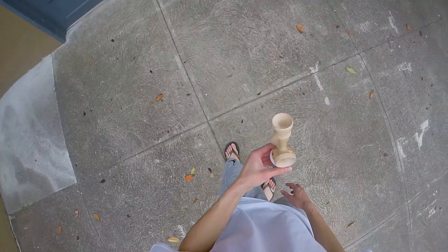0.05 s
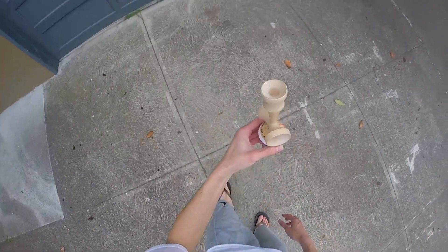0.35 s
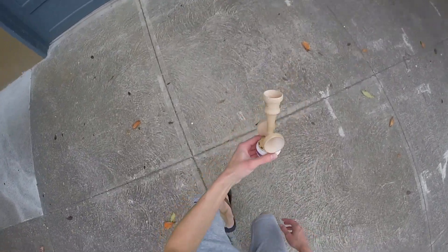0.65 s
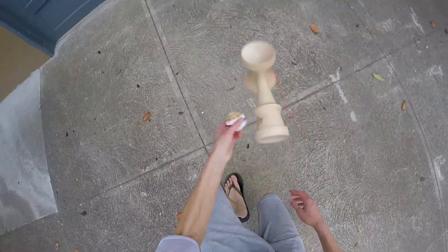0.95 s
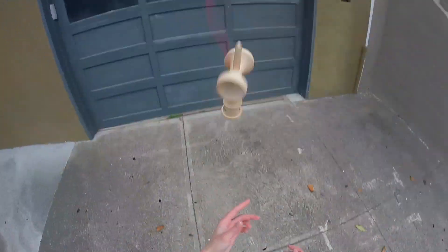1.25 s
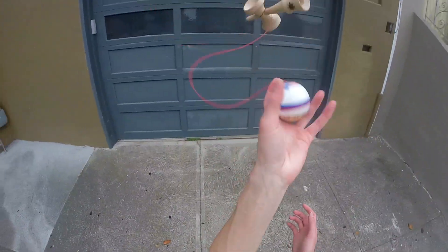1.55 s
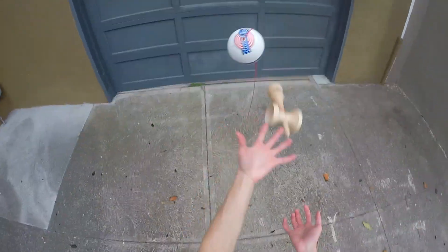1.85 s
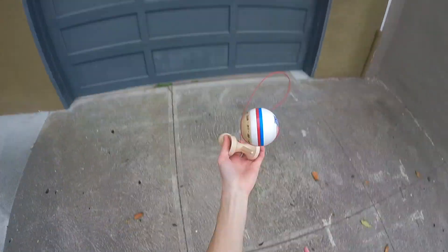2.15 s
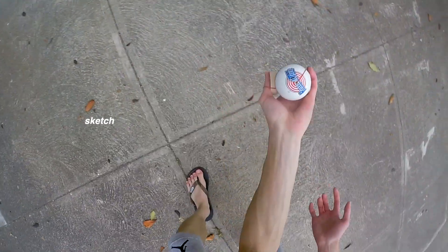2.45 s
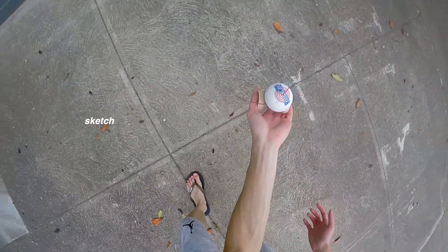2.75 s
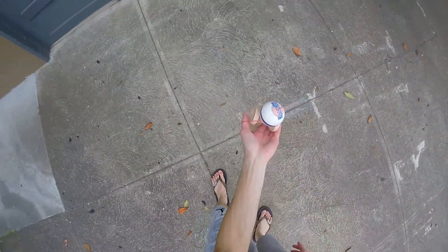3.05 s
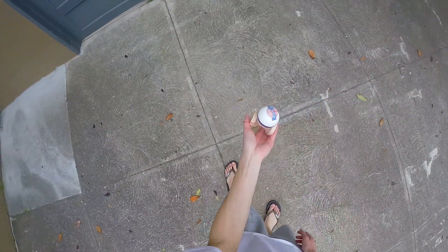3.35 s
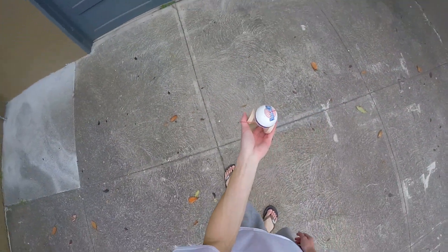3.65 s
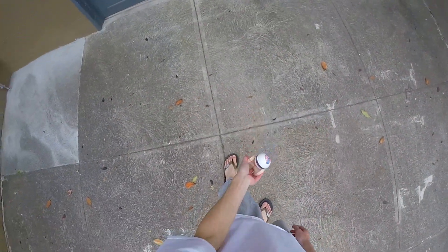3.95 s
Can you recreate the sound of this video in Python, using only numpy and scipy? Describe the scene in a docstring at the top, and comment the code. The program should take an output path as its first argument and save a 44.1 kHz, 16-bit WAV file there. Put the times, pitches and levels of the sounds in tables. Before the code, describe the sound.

Sharp wooden kendama clacks and palm catches outdoors, over faint distant traffic and wind.

```python
"""Sharp wooden clacks: a kendama ball knocks off its spike and meets the handle. The pieces are tossed,
tick in the air as the string flicks the handle, and slap into the palm; at last the ball drops onto
the spike and rattles once. Each clack is a dry crack plus a short ring of wooden modes.
Clothes and sandals scuff; the concrete driveway and a garage door return a short tail.
Behind the play, far traffic rumbles, wind thumps softly and a hiss slowly swells."""
import sys
import numpy as np
from scipy import signal
from scipy.fft import rfft, irfft
from scipy.io import wavfile

SR = 44100
rng = np.random.default_rng(int(sys.argv[2]) if len(sys.argv) > 2 else 0)


def materialize(psi):
    """Save the field psi as 16-bit PCM at rate SR to the path in sys.argv[1].

    A 1-D psi becomes a single channel; in a 2-D psi each row is a channel.
    """
    bounded = np.clip(np.atleast_2d(psi).T, -1, 1)
    quanta = np.round(bounded * 32767).astype(np.int16)
    wavfile.write(sys.argv[1], SR, quanta)


N = 176400
TIME_S = np.arange(N) / SR
BINS_HZ = np.fft.rfftfreq(N, 1 / SR)


def from_db(db):
    """Decibels to gain."""
    return 10 ** (np.asarray(db) / 20)


def unit_rms(x):
    """Scale to unit power."""
    return x / np.sqrt(np.mean(x ** 2) + 1e-20)


def db_at(spectrum, hz):
    """Interpolate (Hz, dB) points on a log-frequency axis."""
    points_hz, db = np.transpose(spectrum)
    return np.interp(np.log(np.maximum(hz, 1)), np.log(points_hz), db)


def add(out, start_s, x):
    """Mix x into out at start_s."""
    i = int(start_s * SR)
    out[i:i + len(x)] += x[:N - i]


def butter(x, order, cut_hz, kind="low"):
    """Causal Butterworth filter."""
    return signal.sosfilt(signal.butter(order, cut_hz, kind, fs=SR, output="sos"), x)


def noise(spectrum, tilt_db_per_oct=0):
    """Unit-RMS noise with a given spectral shape and tilt."""
    hz = np.maximum(BINS_HZ, 1)
    gain = from_db(db_at(spectrum, hz) + tilt_db_per_oct * np.log2(hz))
    return unit_rms(irfft(rfft(rng.standard_normal(N)) * gain, N))


def drift(rate_hz):
    """Smooth random wander, unit RMS."""
    return unit_rms(irfft(rfft(rng.standard_normal(N)) / (1 + (BINS_HZ / rate_hz) ** 2), N))


def bump(centre_s, sigma_s):
    """Gaussian envelope, peak 1."""
    return np.exp(-.5 * ((TIME_S - centre_s) / sigma_s) ** 2)


def decay(t, t60_s):
    """Exponential fall of 60 dB in t60_s."""
    return np.exp(-np.log(1000) * t / t60_s)


def minimum_phase(x, gain_db):
    """Filter by a gain per bin so that nothing sounds early."""
    cepstrum = irfft(np.log(from_db(gain_db)))
    cepstrum[1:len(x) // 2] *= 2
    cepstrum[len(x) // 2 + 1:] = 0
    return irfft(rfft(x) * np.exp(rfft(cepstrum)))


# Far traffic and air; low drone and swell. Each row: frequency in Hz, relative density in dB.
TRAFFIC_SPECTRUM = [(12, 1.5), (20, -6), (105, -5), (183, -11), (445, -17.5), (800, -19), (1050, -26.5),
                    (2220, -36.5), (6010, -52), (15000, -57)]
LOW_SPECTRUM = [(40, -16), (100, -3.5), (170, -3), (300, -11.5), (500, -19.5), (2000, -66)]


def street():
    """Far traffic with wavering bass, a low drone, and one low swell around the first clacks."""
    air = from_db(-46) * noise(TRAFFIC_SPECTRUM)
    bass = signal.sosfiltfilt(signal.butter(2, 200, fs=SR, output="sos"), air)
    rumble = air + bass * (from_db(3.5 * drift(rate_hz=0.71)) - 1)
    drone_hz, width_hz = 104, 39
    resonance = signal.iirpeak(drone_hz, drone_hz / width_hz, fs=SR)
    drone = from_db(-53) * unit_rms(signal.lfilter(*resonance, noise(LOW_SPECTRUM)))
    swell = from_db(-44.5) * bump(centre_s=0.095, sigma_s=0.43) * noise(LOW_SPECTRUM)
    return rumble + drone + swell


# Hiss envelope. Each row: time in seconds, level in dB.
HISS_LEVELS = [(.7, -59), (3.0, -56.5), (3.3, -54), (3.7, -51), (4, -52.5)]
# Each row: frequency in Hz, relative density in dB.
HISS_SPECTRUM = [(100, 9.5), (300, 8), (750, 6.5), (1300, -9.5), (2700, -2), (4000, -7), (6000, -8.5),
                 (11000, -25.5), (15000, -48.5)]


def hiss():
    """A distant hiss grows, peaking near the end."""
    level_db = np.interp(TIME_S, *np.transpose(HISS_LEVELS))
    return from_db(level_db) * noise(HISS_SPECTRUM)


# Puffs of wind. Each row: centre in seconds, sigma in seconds, level in dB.
WIND_GUSTS = [(1.17, 0.03, -48), (2.714, 0.034, -39.5), (2.956, 0.02, -51), (3.895, 0.042, -40.5)]
# Each row: frequency in Hz, relative density in dB.
WIND_SPECTRUM = [(15, -4.5), (30, 10.5), (75, -10), (150, -17.5), (300, -18.5), (1500, -78)]


def wind():
    """Brief gusts buffet as soft, deep thumps."""
    envelope = sum(from_db(db) * bump(centre_s, sigma_s) for centre_s, sigma_s, db in WIND_GUSTS)
    return envelope * noise(WIND_SPECTRUM)


# Ground and garage door. Each row: delay in seconds, gain in dB.
REFLECTIONS = [(.008, -32), (.0156, -21.5)]


def driveway(x):
    """Reflected sound only: two near echoes and a short scatter from the walls."""
    t = TIME_S[:SR // 2]
    tail_db, build_s = -13, 0.0013
    tail = rng.standard_normal(len(t)) * decay(t, t60_s=0.2) * (1 - np.exp(-t / build_s))
    response = from_db(tail_db) * tail / np.linalg.norm(tail)
    for delay_s, db in REFLECTIONS:
        response[int(delay_s * SR)] += from_db(db)
    return signal.fftconvolve(x, response)[:N]


# Rubs. Each row: centre in seconds, sigma in seconds, level in dB, tilt in dB per octave.
RUBS = [(0.96, 0.03, -50, 0.5), (1.1, 0.053, -54, 0), (1.277, 0.021, -49.5, 0.5),
        (1.708, 0.045, -46.5, 0.5), (1.851, 0.038, -44.5, 0.14), (1.958, 0.005, -43, 1),
        (2.109, 0.035, -48, 0), (2.182, 0.01, -51, 1), (2.305, 0.017, -47, -0.2), (2.37, 0.035, -40.5, 0.2)]
# Each row: frequency in Hz, relative density in dB.
RUB_SPECTRUM = [(200, -0.5), (750, 5.5), (1300, -5.5), (2600, -10), (6000, -19), (8000, -35), (13000, -35),
                (16000, -82)]


def scuffs():
    """Clothes, string and sandals rub in grainy bursts as the player moves."""
    rubs = sum(from_db(db) * bump(centre_s, sigma_s) * noise(RUB_SPECTRUM, tilt)
               for centre_s, sigma_s, db, tilt in RUBS)
    grain = unit_rms(from_db(3.5 * drift(rate_hz=58)))
    return rubs * grain


# Wood lands in the palm. Each row: start in seconds, pulse peak in dB, low and high edge in Hz,
# then the cupped hand's pitch in Hz, peak in dB and T60 in seconds.
CATCHES = [(1.6566, -34.5, 400, 2600, 2620, -41.5, 0.014), (1.6697, -31.5, 596, 1830, 1470, -41, 0.014),
           (1.6714, -25.5, 240, 1440, 1030, -33, 0.029), (1.9527, -29, 217, 2170, 564, -29.5, 0.0076),
           (2.0857, -41, 500, 2380, 1500, -42, 0.01), (2.3483, -22.5, 380, 1730, 840, -19, 0.012)]


def palm_slaps(size=2048):
    """The palm damps the wood at once: one dull pulse, and the cupped hand rings briefly."""
    out, t = np.zeros(N), TIME_S[:size]
    for start_s, pulse_db, low_hz, high_hz, hand_hz, hand_db, t60_s in CATCHES:
        pulse = butter(signal.unit_impulse(size), 6, high_hz)
        pulse = butter(pulse, 2, low_hz, "high")
        cavity = np.cos(2 * np.pi * hand_hz * t) * decay(t, t60_s)
        hand = signal.fftconvolve(pulse, cavity)[:size]
        add(out, start_s, from_db(pulse_db) * pulse / np.abs(pulse).max())
        add(out, start_s, from_db(hand_db) * hand / np.abs(hand).max())
    return out


# Centres of the low, middle, high and top bands.
BANDS_HZ = [940, 2370, 3670, 6470]
# Dry crack of wood on wood. Each row: frequency in Hz, relative gain in dB.
CRACK_SPECTRUM = [(250, 4), (850, 15), (1350, -2), (1800, 10), (2700, 1), (3900, 12.5), (5000, -1),
                  (6300, -1.5), (8000, -1), (11000, -4), (15000, -10)]


def struck_wood(contacts, modes_hz, modes_db, modes_t60_s, size=8192):
    """Crack plus modes: the contact point weights the bands, grip sets the ring, hardness the cut-off."""
    out, t = np.zeros(N), TIME_S[:size]
    bins_hz = np.fft.rfftfreq(size, 1 / SR)
    contact_s = 0.0004
    onset = 1 - np.exp(-(t / contact_s) ** 2)
    for start_s, *bands_db, t60_factor, cut_hz in contacts:
        bands = list(zip(BANDS_HZ, bands_db))
        ring = sum(from_db(db + db_at(bands, hz)) * np.sin(2 * np.pi * hz * t)
                   * decay(t, t60_s * t60_factor)
                   for hz, db, t60_s in zip(modes_hz, modes_db, modes_t60_s))
        grain = 0.35 * rng.standard_normal(size) * decay(t, t60_s=0.01)
        force = signal.unit_impulse(size) + grain
        crack = minimum_phase(force, db_at(CRACK_SPECTRUM, bins_hz) + db_at(bands, bins_hz))
        add(out, start_s, butter(crack + ring * onset, 4, cut_hz))
    return butter(out, 2, 330, "high")  # small parts radiate little bass


# String on handle. Each row: start in seconds, four band gains in dB, T60 factor, cut-off in Hz.
STRING_HITS = [(1.0655, -62, -54, -58, -39, .35, 14000), (1.3255, -54, -38, -43, -40, 0.3, 14000),
               (1.3290, -29, -55, -41.5, -39.5, 0.79, 14000)]
# Modes of the free handle.
FREE_MODES_HZ = [3080, 3430, 4177, 6067, 6780, 8400, 11200]
FREE_MODES_DB = [-3.5, -7.5, -2, -10.5, -13, -16, -24]
FREE_MODES_T60_S = [0.055, 0.096, 0.056, 0.061, .05, .03, 0.022]


def string_ticks():
    """The string flicks the flying handle, which rings high."""
    return struck_wood(STRING_HITS, FREE_MODES_HZ, FREE_MODES_DB, FREE_MODES_T60_S)


# Knocks on the rim. Each row: start in seconds, four band gains in dB, T60 factor, cut-off in Hz.
RIM_HITS = [(.0398, -22.5, -16, -21, -19.5, 0.51, 8040), (.0514, -35, -32, -40, -27.5, 1.76, 8000)]
# Modes of the ball loose on the spike.
LOOSE_MODES_HZ = [1005, 3330, 4200, 4520, 6200, 6520]
LOOSE_MODES_DB = [-6, -4.5, -10.5, -5.5, -5.5, -4]
LOOSE_MODES_T60_S = [0.047, 0.032, 0.044, 0.02, 0.012, 0.0077]


def ball_leaves_spike():
    """The rim knocks as the ball lifts off. Two layers: modes add in phase, each has its own grain."""
    return sum(struck_wood(RIM_HITS, LOOSE_MODES_HZ, LOOSE_MODES_DB, LOOSE_MODES_T60_S)
               for _ in range(2))


# Ball on spike. Each row: start in seconds, four band gains in dB, T60 factor, cut-off in Hz.
SPIKE_HITS = [(2.3481, -26, -24, -27, -21, 0.56, 5600), (2.3545, -22.5, -35.5, -20.5, -29, 0.49, 9800)]
# Modes of the seated ball.
SEATED_MODES_HZ = [601, 768, 950, 1260, 1710, 2015, 3230, 3340, 3990, 4115, 4720, 5150, 5720, 6200]
SEATED_MODES_DB = [-4, -2, -1.5, -13, 5, -14, -3, -24, -6, -1, 1.5, 0, -17, -19]
SEATED_MODES_T60_S = [0.053, 0.041, 0.049, 0.012, 0.029, 0.056, 0.06, 0.032, .025, 0.03, 0.026, 0.021,
                      0.019, 0.029]
# Spike scraping. Each row: frequency in Hz, relative density in dB.
SCRAPE_SPECTRUM = [(2000, -22), (3800, -10), (5000, 7), (6400, 6), (7300, -12), (10000, -21), (15000, -41)]


def ball_lands_on_spike():
    """The ball drops on and rattles once; the spike scrapes in the hole as it settles."""
    knocks = struck_wood(SPIKE_HITS, SEATED_MODES_HZ, SEATED_MODES_DB, SEATED_MODES_T60_S)
    scrape = from_db(-41.5) * bump(centre_s=2.365, sigma_s=0.0077) * noise(SCRAPE_SPECTRUM)
    return knocks + scrape


# Ball on handle; the row at .0775 s is the ground's echo of the clack just before it. Each row: start in
# seconds, four band gains in dB, T60 factor, cut-off in Hz.
HANDLE_HITS = [(.0632, -25, -33, -27, -26, 1.03, 9000), (.0672, -40, -7, -14.5, -53, 0.2, 4450),
               (.0698, -34, -15.5, -16, -26.5, 0.82, 13100), (.0775, -24.5, -25, -36, -22, 0.38, 6500),
               (.938, -41.5, -53, -45.5, -60, 2.2, 5000), (1.7375, -36, -32, -40.5, -25, 0.34, 4800),
               (2.005, -41, -39, -47.5, -39, 0.41, 4500), (2.119, -44, -40, -50, -40, 0.45, 5500),
               (2.295, -50, -41, -54, -42, 0.24, 10000), (2.3926, -28.5, -24.5, -24, -26, 0.48, 4230),
               (3.565, -40, -60, -48, -56, 0.8, 4500)]
# Modes of the handle with the ball against it.
HANDLE_MODES_HZ = [603, 665, 765, 975, 1690, 2056, 2376, 2725, 3240, 3370, 3440, 3520, 3625, 3940, 4115,
                   4415, 6150, 6500, 7450, 7950, 9450]
HANDLE_MODES_DB = [-18, -5, -2.5, -6, -23, -4.5, -1, -13, -8, -4.5, -13, -12.5, -11.5, 2, -8.5, -5, -15, -6,
                   -1, -9, -14]
HANDLE_MODES_T60_S = [0.054, 0.1, 0.043, 0.064, 0.037, 0.042, 0.023, 0.044, 0.034, 0.068, 0.18, 0.12, .05,
                      0.026, 0.02, 0.024, 0.012, 0.025, .011, .023, 0.023]


def handle_clacks():
    """Ball and handle meet and ring together."""
    return struck_wood(HANDLE_HITS, HANDLE_MODES_HZ, HANDLE_MODES_DB, HANDLE_MODES_T60_S)


def scene():
    """Mono mix of the background, the play and its reflections."""
    background = street() + hiss() + wind()
    wood = string_ticks() + ball_leaves_spike() + ball_lands_on_spike() + handle_clacks()
    play = scuffs() + palm_slaps() + wood
    return (background + play + driveway(play))[None]


def record(dry):
    """Steep low-pass at 15.2 kHz."""
    return signal.sosfilt(signal.ellip(10, .1, 70, 15200, fs=SR, output="sos"), dry)


dry = scene()
out = record(dry)
materialize(out)
```